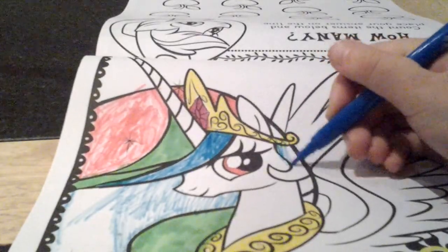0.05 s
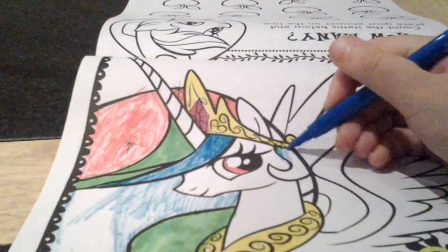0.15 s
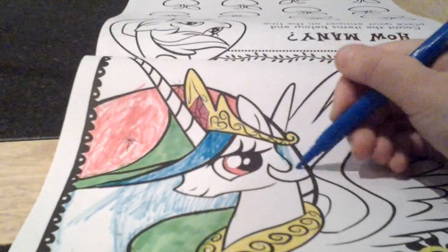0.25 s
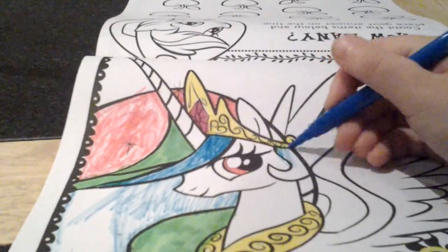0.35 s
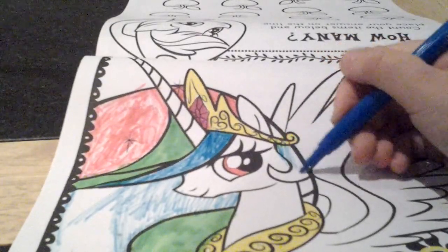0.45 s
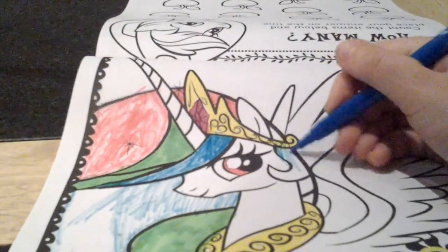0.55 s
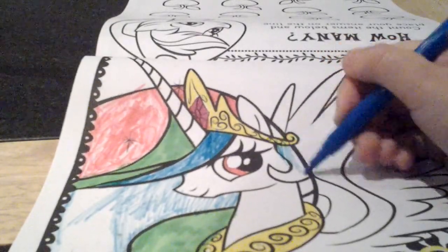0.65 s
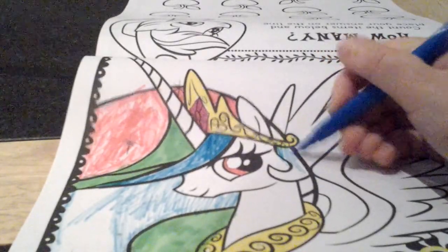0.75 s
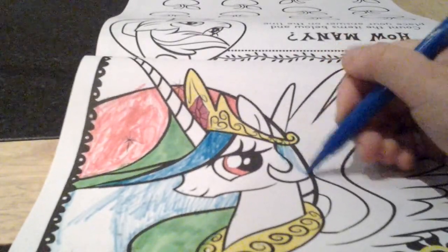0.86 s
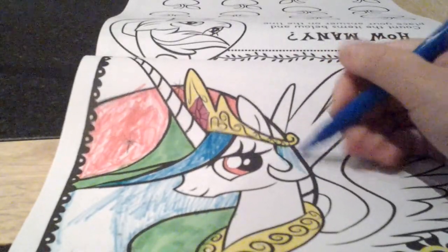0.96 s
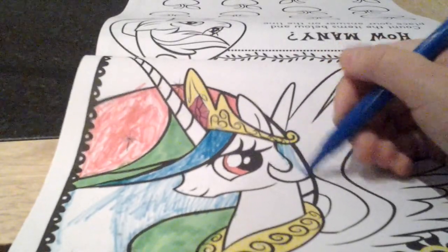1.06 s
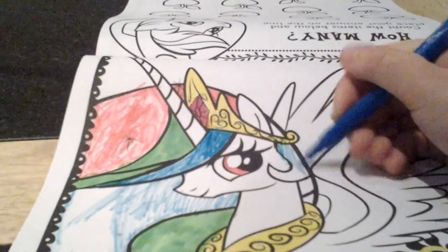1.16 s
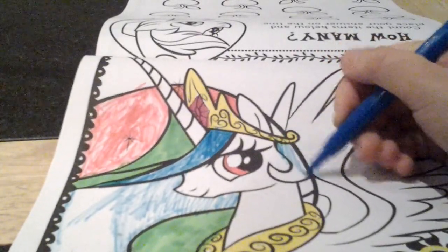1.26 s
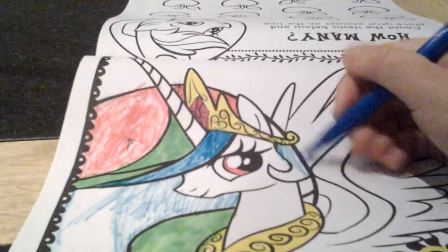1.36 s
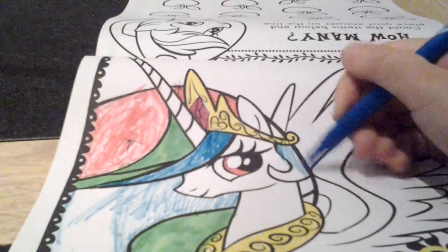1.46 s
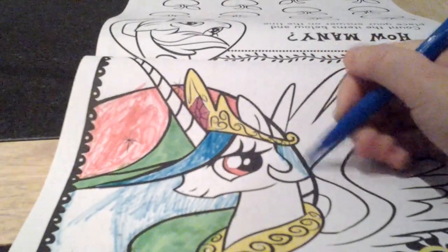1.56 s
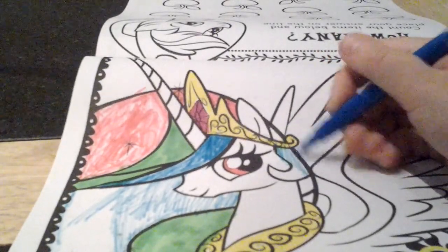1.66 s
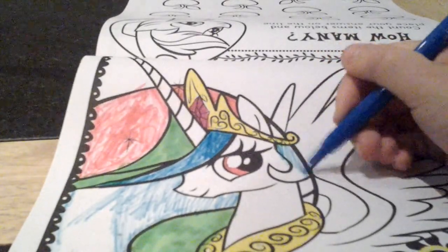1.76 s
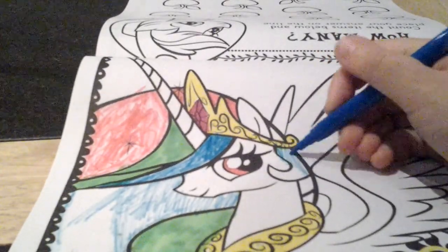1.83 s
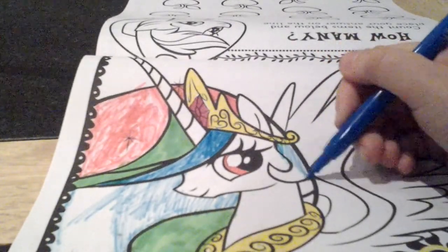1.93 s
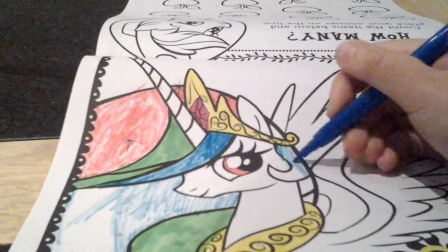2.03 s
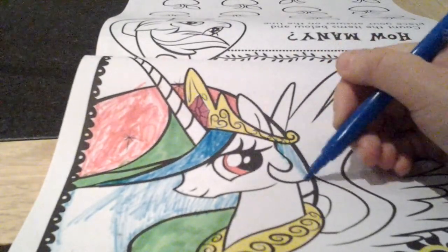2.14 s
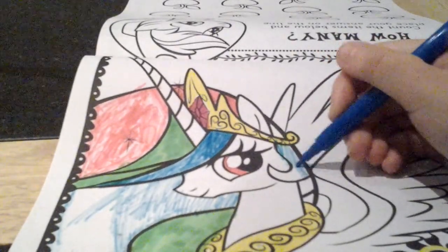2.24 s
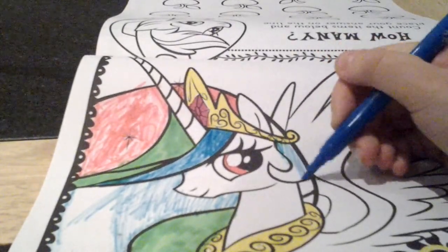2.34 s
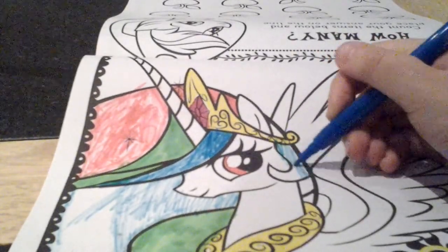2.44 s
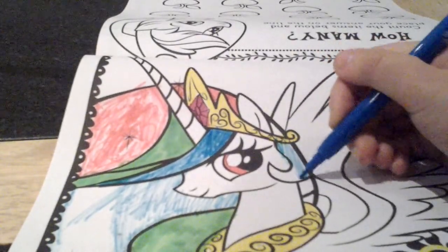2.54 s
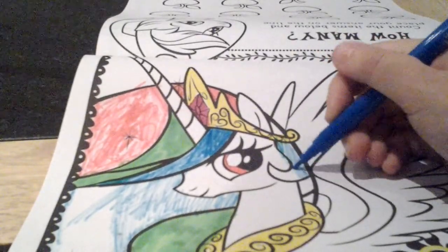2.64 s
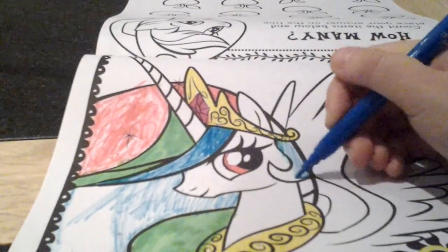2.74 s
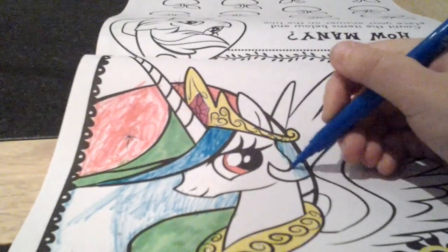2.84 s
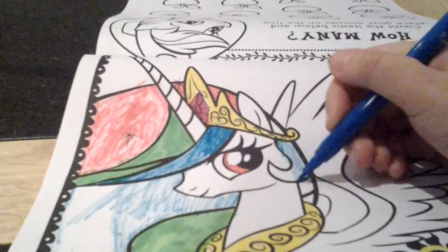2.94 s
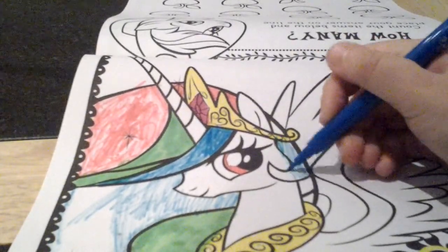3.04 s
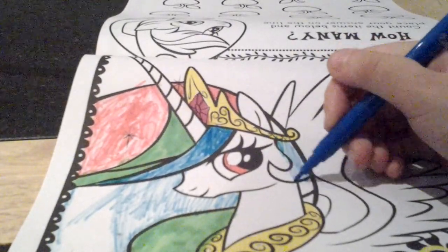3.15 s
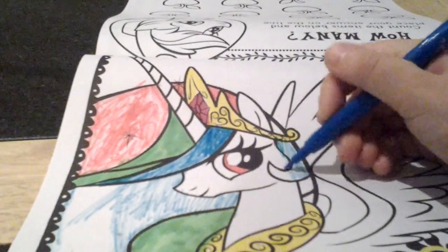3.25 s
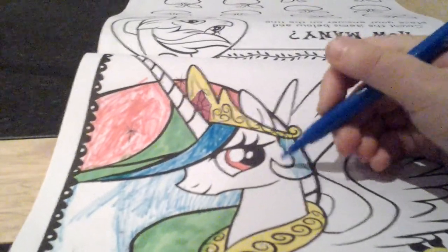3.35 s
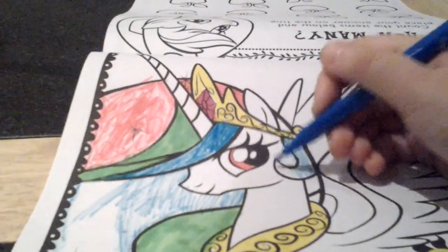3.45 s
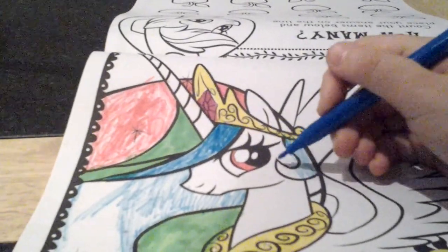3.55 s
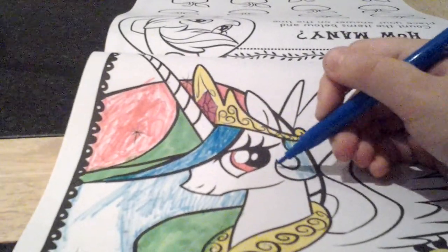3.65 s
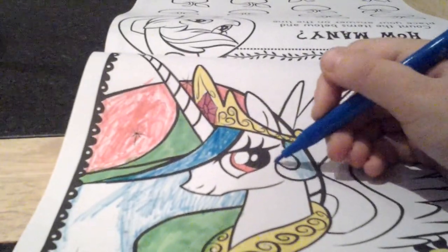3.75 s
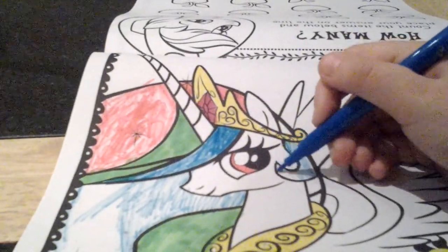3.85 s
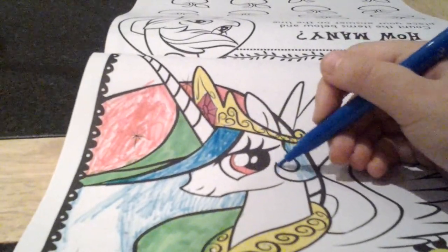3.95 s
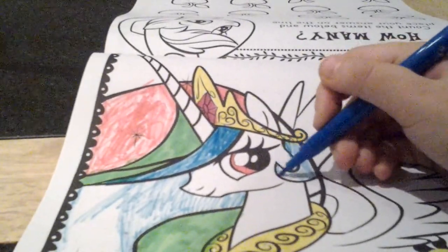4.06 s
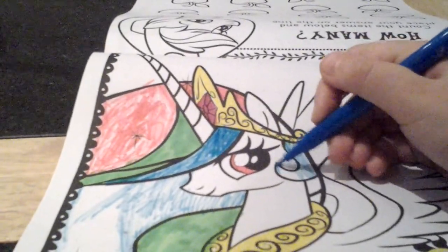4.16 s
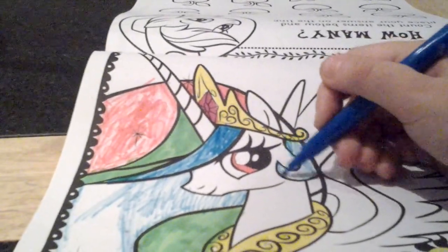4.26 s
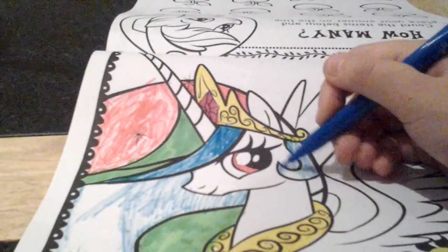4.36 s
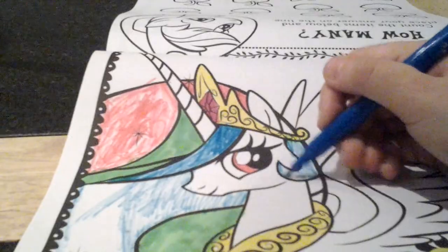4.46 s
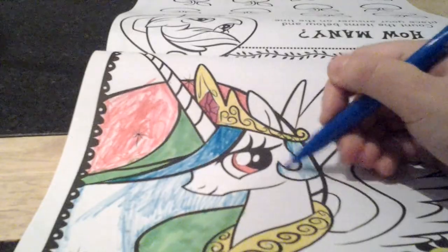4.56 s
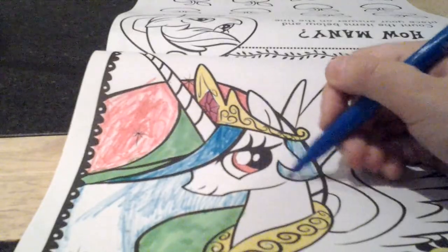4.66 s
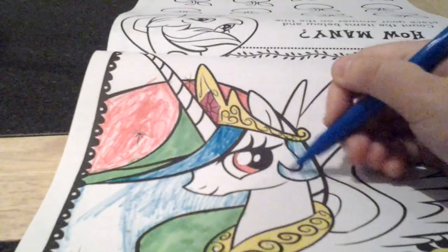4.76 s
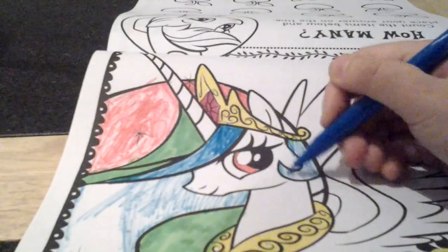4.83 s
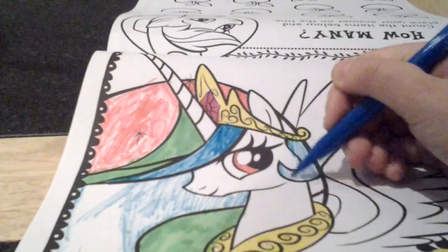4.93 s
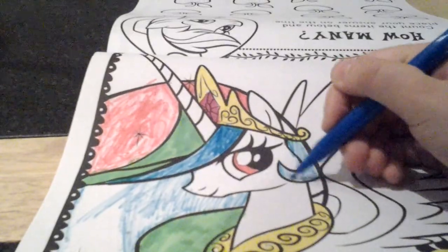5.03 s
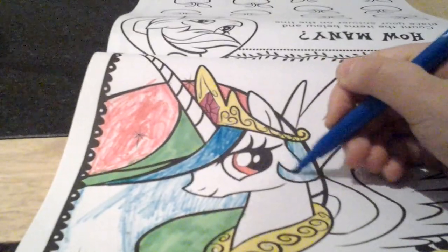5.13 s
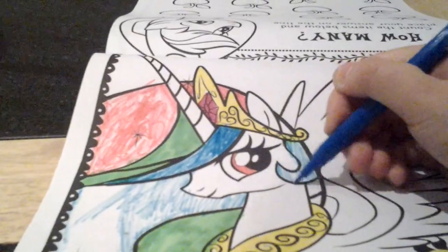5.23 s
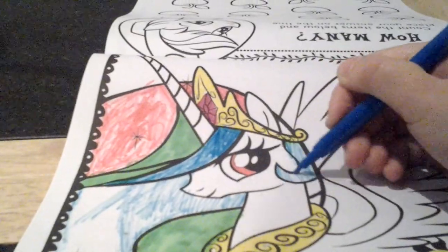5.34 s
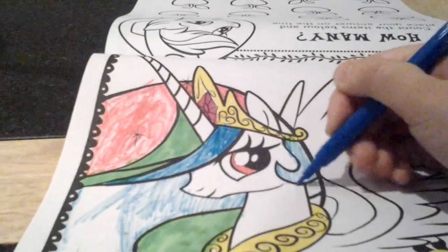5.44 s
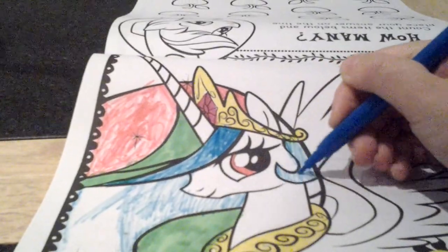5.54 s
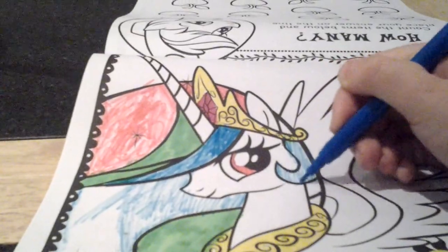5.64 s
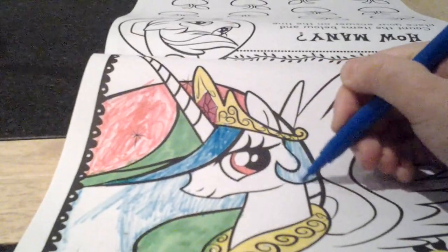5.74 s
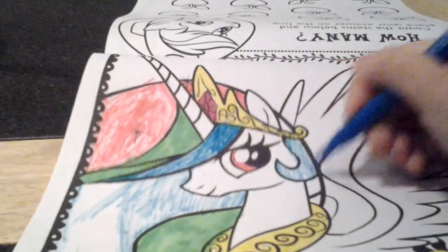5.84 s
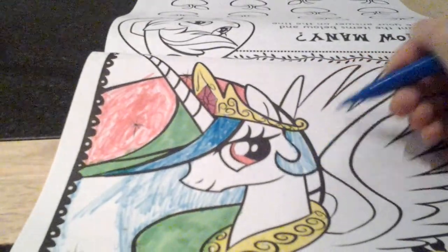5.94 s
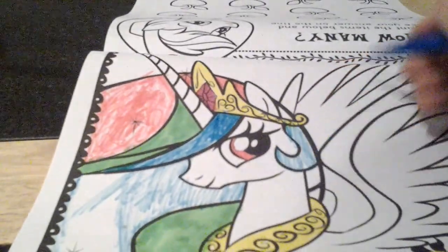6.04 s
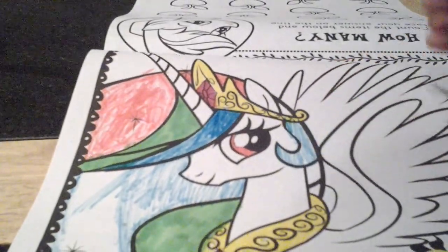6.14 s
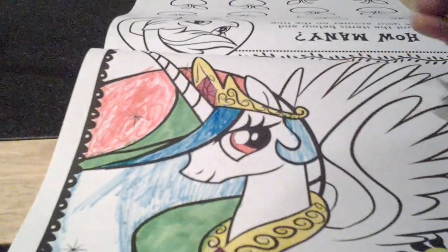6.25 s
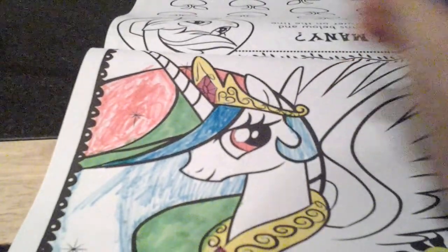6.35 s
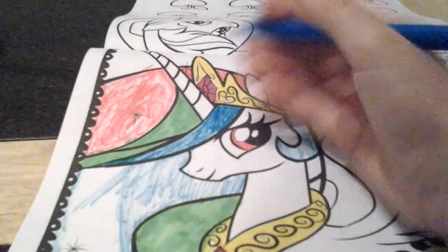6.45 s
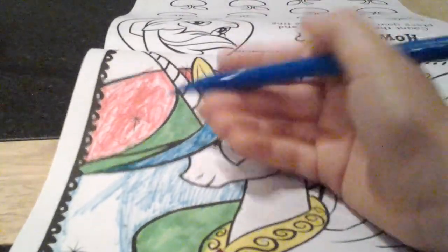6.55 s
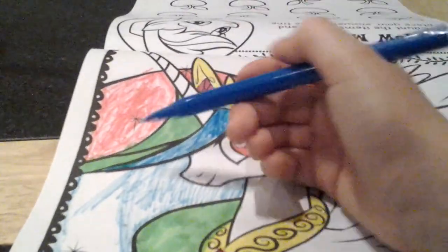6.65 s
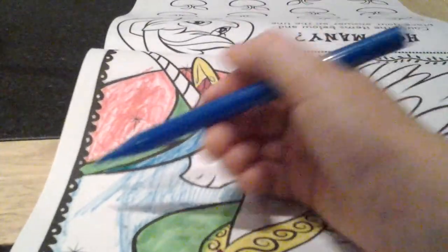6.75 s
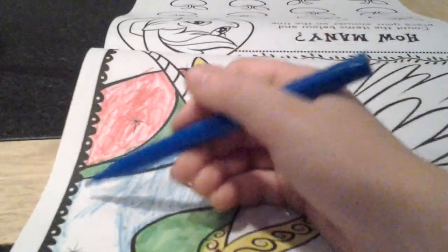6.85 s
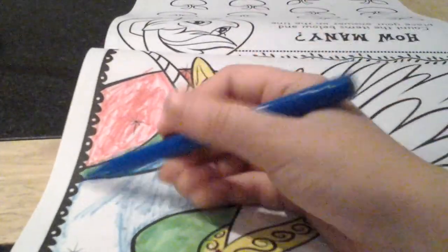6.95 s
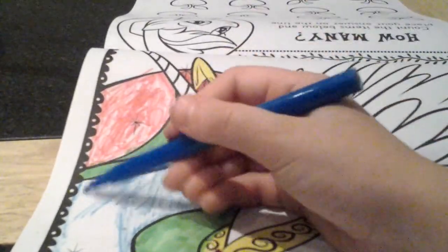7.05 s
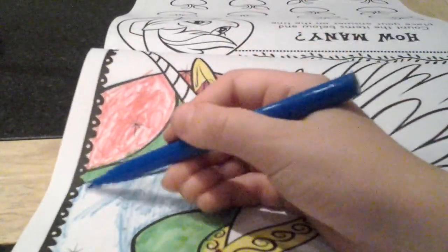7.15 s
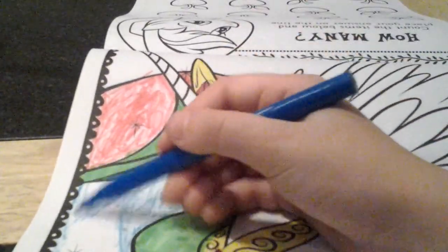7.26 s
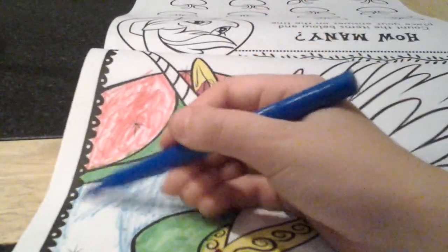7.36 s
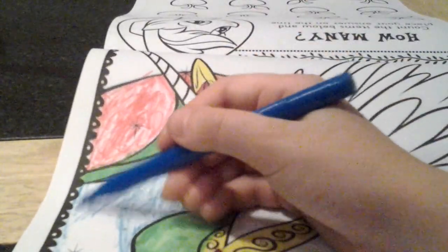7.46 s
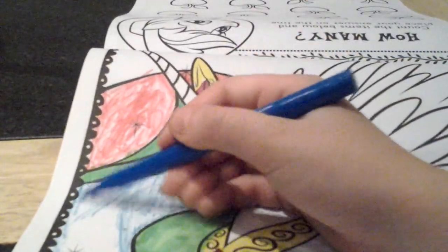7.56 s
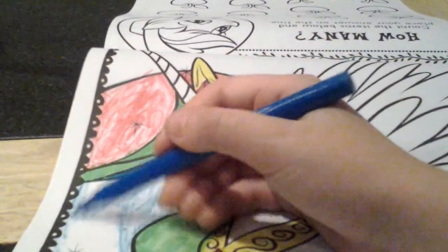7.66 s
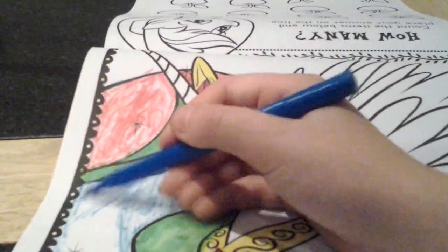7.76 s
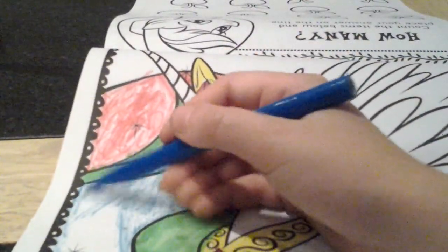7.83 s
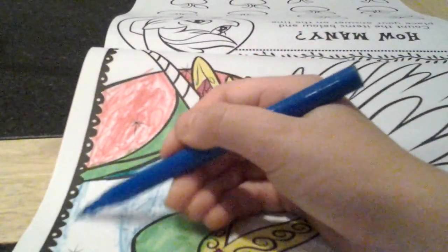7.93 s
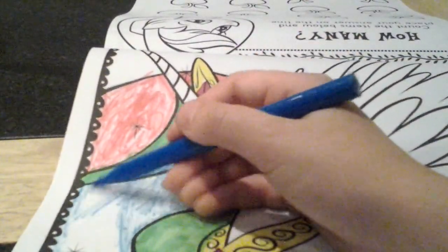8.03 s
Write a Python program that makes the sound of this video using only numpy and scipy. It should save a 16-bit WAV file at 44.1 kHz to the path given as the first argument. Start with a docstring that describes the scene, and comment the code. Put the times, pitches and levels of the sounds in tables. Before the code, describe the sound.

In a quiet, nearly echo-free room, a small close microphone with little bass picks up a felt-tip pen colouring a book page. From 0 to 3.3 s it scribbles back and forth about ten times a second, each stroke a short bright hiss with a lower papery scrape and soft page drumming; it is strongest around 0.7 to 2 s, then lightens slightly. At 3.4 s the pen lifts with small ticks and a brief hand rub, leaving faint low rumble. Very light strokes return at 3.9 s, growing firmer, with duller bumps up to 5.8 s. From 5.8 to 7.05 s the hand slides away and back, with airy skin-on-paper swishes and knocks near 5.9 and 6.2 s. From 7.2 s firmer, brighter scribbling runs to the end just after 8 s, with sharp plastic clicks at 7.72, 7.92 and 8.05 s, the first loudest. Soft steady room noise throughout.

```python
"""Quick hissing strokes, about ten a second: a felt-tip pen colours in a page of a colouring book on a table.
The nib hisses and scrapes over the paper fibres and shakes the page, which drums near 900 Hz.
The pen lifts once; later the hand slides away and back across the page.
Then the pen scribbles on with a flatter grip and clicks sharply three times.
Noise shaped into colours makes the hiss and rubs; decaying tones make the drumming, knocks and clicks."""
import sys
import numpy as np
from scipy import signal
from scipy.fft import rfft, irfft, next_fast_len
from scipy.io import wavfile

SR = 44100
rng = np.random.default_rng(int(sys.argv[2]) if len(sys.argv) > 2 else 0)


def store_wav(level_fs):
    """Save 16-bit WAV to argv[1]."""
    pcm = np.round(np.clip(np.atleast_2d(level_fs), -1, 1) * 32767)
    wavfile.write(sys.argv[1], SR, pcm.T.astype(np.int16))


N = 356929
TIME = np.arange(N) / SR


def from_db(db):
    """Turn decibels into a gain."""
    return 10 ** (np.asarray(db) / 20)


def rms_one(x):
    """Scale a sound to an average strength (rms) of one."""
    return x / np.sqrt(np.mean(x ** 2) + 1e-20)


def level(rows):
    """Make a gain that follows a curve of times and decibels."""
    time_s, level_db = np.transpose(rows)
    return from_db(np.interp(TIME, time_s, level_db))


def gate(t, start, end, attack_s, release_s):
    """A sound sets in, holds and stops: gain from 0 to 1."""
    setting_in = 1 + np.tanh((t - start) / attack_s)
    stopping = 1 + np.tanh((end - t) / release_s)
    return setting_in * stopping / 4


def cut(x, hz, kind="low", order=2):
    """Remove what lies above (low) or below (high) a pitch."""
    sos = signal.butter(order, min(hz, .45 * SR), kind, fs=SR, output="sos")
    return signal.sosfilt(sos, x + 1e-18)


def colour(x, spectrum, peaks=()):
    """Give noise a broad spectrum with resonances on top, at an rms of one."""
    size = next_fast_len(len(x), real=True)
    bins = np.maximum(np.fft.rfftfreq(size, 1 / SR), 1)
    hz, db = np.transpose(spectrum)
    shape = np.interp(np.log(bins), np.log(hz), db)
    for centre, width, height in peaks:
        shape = shape + height / (1 + (2 * (bins - centre) / width) ** 2)
    coloured = irfft(rfft(x, size) * from_db(shape), size)
    return rms_one(coloured[:len(x)])


def bell(x, hz, width_hz, db):
    """Raise or lower a narrow band around one pitch."""
    w, height = 2 * np.pi * hz / SR, np.sqrt(from_db(db))
    spread = np.tan(np.pi * width_hz / SR)
    top = [1 + spread * height, -2 * np.cos(w), 1 - spread * height]
    bottom = [1 + spread / height, -2 * np.cos(w), 1 - spread / height]
    return signal.lfilter(top, bottom, x)


def ring(x, modes):
    """Strike several decaying tones side by side, with alternating sign."""
    out = np.zeros(len(x))
    for k, (hz, db, fade_s) in enumerate(modes):
        r, w = from_db(-60 / (fade_s * SR)), 2 * np.pi * hz / SR
        tone = signal.lfilter([0, np.sin(w)], [1, -2 * r * np.cos(w), r * r], x + 1e-18)
        out += (-1) ** k * from_db(db) * tone
    return out


def blows(rows, column=1):
    """Place one single-sample blow per row, as strong as its decibel column."""
    out = np.zeros(N)
    for row in rows:
        out[round(row[0] * SR)] = from_db(row[column])
    return out


def drift(rate_hz):
    """Wander smoothly at random, with a spread of one."""
    return rms_one(cut(rng.standard_normal(N), rate_hz))


def fibres(per_s, spread_db):
    """Paper fibres catch and let go at random, with uneven force."""
    caught = rng.random(N) < per_s / SR
    force = rng.choice([-1, 1], N) * from_db(spread_db * rng.standard_normal(N))
    return rms_one(caught * force)


# colour of the quiet room's noise: pitch_hz [Hz], level_db [dB per Hz, relative]
ROOM_TONE = [(25, 5), (50, -24), (80, -14.5), (130, -7), (260, -5), (600, -5), (1300, -11.5), (2900, -15),
             (4300, -16), (11700, -17), (14500, -21)]


def room_tone(level_db=-55):
    """The quiet room is a steady, soft noise under everything."""
    return from_db(level_db) * colour(rng.standard_normal(N), ROOM_TONE)


def room(x, fade_s=0.1, wet_db=-13.5, dull_hz=6000):
    """The walls add a faint, dull tail of fading noise."""
    t = TIME[:SR // 2]
    fading = from_db(-60 * t / fade_s) * (t > .005)
    tail = cut(rng.standard_normal(len(t)), dull_hz) * fading
    return x + from_db(wet_db) * signal.fftconvolve(x, tail / np.linalg.norm(tail))[:N]


# swells of the low rumble, mostly in the pauses between strokes: start_s [s], end_s [s], level_db [dB]
RUMBLE_SWELLS = [(3.458, 3.835, -60), (3.87, 3.962, -65), (5.875, 6.184, -65), (6.73, 6.83, -62),
                 (6.94, 7.144, -61.5)]


def rumble(attack_s=0.012, release_s=0.016):
    """A low rumble, made of deep noise, swells mostly in the pauses between strokes."""
    low = colour(rng.standard_normal(N), [(40, -27), (100, -2.5), (190, -9.0), (320, -16), (1000, -45)])
    swells = np.zeros(N)
    for start, end, db in RUMBLE_SWELLS:
        swells += from_db(db) * gate(TIME, start, end, attack_s, release_s)
    return low * swells


# the hand slides on the page: start_s [s], end_s [s], rub_db [dB, before rub_gain_db], hiss_db [dB]
SLIDES = [(3.355, 3.432, -55.5, -48.5), (3.437, 3.556, -62.5, -64), (5.8, 6.034, -60, -60.5),
          (6.127, 6.403, -57.5, -54.5), (6.22, 6.27, -67, -55), (6.4, 6.557, -54.5, -48),
          (6.562, 6.706, -60, -43), (6.87, 6.952, -54.5, -42.5), (7.004, 7.041, -59, -51.5)]
# colour of skin rubbing: pitch_hz [Hz], level_db [dB per Hz, relative]
RUB_COLOUR = [(150, -16), (400, 2), (900, 4.5), (1500, 0.5), (2500, -2.5), (4500, -3.5), (7000, -14),
              (14000, -10.5)]
# colour of skin hissing: pitch_hz [Hz], level_db [dB per Hz, relative]
SKIN_HISS_COLOUR = [(2000, -10.5), (4000, 2), (5500, 4), (6600, 9.5), (8000, 3.5), (10000, -6), (14500, -4)]


def hand(rub_gain_db=4.5, attack_s=0.0064, release_s=0.023):
    """Skin drags on paper: a grainy rub and, with a light quick touch, a smooth hiss."""
    rubbing, hissing = np.zeros(N), np.zeros(N)
    for start, end, rub_db, hiss_db in SLIDES:
        move = gate(TIME, start, end, attack_s, release_s)
        rubbing += from_db(rub_db) * move
        hissing += from_db(hiss_db) * move
    rub = colour(fibres(per_s=6000, spread_db=4.0), RUB_COLOUR) * rubbing
    hiss = colour(rng.standard_normal(N), SKIN_HISS_COLOUR) * hissing
    return from_db(rub_gain_db) * rub + hiss


# small knocks on the book: time_s [s], tick_db [dB, strength of blow], thud_db [dB, strength of blow]
KNOCKS = [(3.3745, -30.5, -32.5), (3.3838, -45, -40), (3.3882, -45, -40), (3.4122, -39, -54),
          (4.7015, -50, -41), (5.8975, -56, -33.5), (5.908, -54, -38), (6.1899, -32, -29),
          (6.204, -43, -44), (6.276, -40.5, -50)]
# tones of a tick: pitch_hz [Hz], level_db [dB, relative], fade_s [s to fall 60 dB]
TICK_MODES = [(2670, 7.5, 0.0017), (4940, 7.5, 0.0025), (5660, 1, 0.0075), (7100, 7.5, 0.0019)]
# tones of a thud: pitch_hz [Hz], level_db [dB, relative], fade_s [s to fall 60 dB]
THUD_MODES = [(457, 2.2, 0.012), (690, 2.6, 0.011), (1050, -1, 0.0097)]


def knocks():
    """The surface ticks and the stack of pages under it gives a dead thud at once."""
    tick = ring(blows(KNOCKS, column=1), TICK_MODES)
    thud = ring(blows(KNOCKS, column=2), THUD_MODES)
    return cut(tick + thud, 320, "high")


# swell of the hiss along the stroke [dB], brightness [dB], shaking of the page [dB]
PUSH, PULL = (0.68, -0.5, 1.07), (2, 1.7, -2)


def direction(k):
    """Strokes go back and forth: even ones push the nib, odd ones pull it."""
    return PULL if k % 2 else PUSH


# how loudly the page drums at the spot being coloured: time_s [s], level_db [dB, before drum_db]
PAGE_DRIVE = [(0.0, -47.5), (1.2, -47), (1.87, -44), (2.25, -53), (3.3, -51), (3.9, -54), (4.85, -46),
              (5.2, -48.5), (5.65, -45), (5.85, -42.5), (7.2, -51.5), (7.68, -45.5), (8.09, -49.5)]


def shaking(push_lead_s=0.0068, pull_lead_s=0.027, rise_s=0.054, fall_s=0.039):
    """A push shakes the page hardest near its end; a pull shakes it less, and earlier in the stroke."""
    power = np.zeros(N)
    for k, (_, end, _) in enumerate(STROKES):
        t = TIME - end + (pull_lead_s if k % 2 else push_lead_s)
        near = abs(t) < .25
        width = np.where(t[near] < 0, rise_s, fall_s)
        power[near] += from_db(direction(k)[2]) ** 2 * np.exp(-(t[near] / width) ** 2)
    return np.sqrt(power) * level(PAGE_DRIVE)


# the nib bumps the page: time_s [s], level_db [dB, strength of blow before softening]
BUMPS = [(0.04, -43), (0.222, -43), (0.804, -38), (1.277, -42), (1.447, -31.5), (1.666, -30),
         (1.877, -30.5), (3.433, -34), (4.223, -34.5), (4.435, -34), (4.642, -43), (4.839, -28.5),
         (5.047, -34.5), (5.369, -28), (5.426, -28.5), (5.611, -22.5), (5.623, -26.5), (5.761, -29.5),
         (5.861, -30.5)]
# tones of the page on the book: pitch_hz [Hz], level_db [dB, relative], fade_s [s to fall 60 dB]
PAGE_MODES = [(470, -19.5, 0.016), (667, -10.5, 0.012), (876, -4, 0.042), (995, -6.5, 0.045),
              (1113, -6.5, 0.023), (1660, -4, 0.0033), (1840, -11, 0.015)]


def page(drum_db=-3.0, soft_hz=1500):
    """Uneven slips of the nib keep the page drumming; soft bumps strike the same tones."""
    slips = cut(fibres(per_s=1200, spread_db=6.0), soft_hz)
    drum = rms_one(cut(ring(slips, PAGE_MODES), 390, "high")) * shaking()
    soft_blows = cut(blows(BUMPS), 1800)
    bumps = cut(ring(soft_blows, PAGE_MODES), 280, "high")
    return from_db(drum_db) * drum + bumps


# sharp clicks of the plastic pen: time_s [s], level_db [dB, before click_db], contact_cutoff_hz [Hz]
CLICKS = [(7.7234, -1.5, 10300), (7.9178, -7.5, 5500), (8.0487, -11, 4900)]
# tones of the pen against the page: pitch_hz [Hz], level_db [dB, relative], fade_s [s to fall 60 dB]
PEN_MODES = [(714, -11, 0.014), (1626, -17.5, 0.01), (2660, -13, 0.0053), (4120, -14, 0.011),
             (5130, -10.5, 0.015), (6200, -8.5, 0.0043), (7200, -5.5, 0.0039), (9060, -4, 0.0031),
             (11000, -17, 0.011)]


def pen_clicks(click_db=0.55, rattle_s=.00068, rattle_db=-7.0):
    """Each click rings the pen for a few milliseconds and strikes once more at once; softer contact is duller."""
    out = np.zeros(N)
    for time_s, level_db, cutoff_hz in CLICKS:
        contact = cut(signal.unit_impulse(SR // 100), cutoff_hz, order=1)
        for delay_s, change_db in ((0, 0), (rattle_s, rattle_db)):
            at = round((time_s + delay_s) * SR)
            out[at:at + len(contact)] += from_db(level_db + change_db + click_db) * contact
    return cut(ring(out, PEN_MODES), 750, "high")


REGRIP_S = (3.6, 6.5)  # times of a new grip [s]
# nib hiss with the pen upright: pitch_hz [Hz], level_db [dB per Hz, relative]
UPRIGHT = [(2000, -23), (3600, -15.5), (4500, -8), (5500, -2), (7200, 1), (8800, 1), (10500, -3.5),
           (12500, -5.5), (14500, -45)]
# nib hiss with the pen held flat: pitch_hz [Hz], level_db [dB per Hz, relative]
FLAT = [(2000, -37), (3500, -12), (4500, -4.5), (6200, -0.5), (7500, 3), (8900, 0.5), (10200, 2.5),
        (11500, -2), (12600, -4.5), (14500, -7.5)]
# pen resonances in the first grip: pitch_hz [Hz], width_hz [Hz], height_db [dB]
FIRST_PEAKS = [(5500, 500, 3), (6200, 400, -3), (7950, 300, -2), (8450, 350, 5), (8790, 220, -7),
               (10000, 500, 4), (10830, 260, 5), (11230, 240, -6), (13100, 400, 3)]
# pen resonances in the second grip: pitch_hz [Hz], width_hz [Hz], height_db [dB]
SECOND_PEAKS = [(4150, 300, 3), (5280, 650, 5), (6100, 400, -4), (6900, 400, 3), (7830, 300, -5),
                (8350, 380, 6), (8830, 260, -6), (9800, 700, 3), (10900, 350, 4), (11520, 350, -5)]
# pen resonances in the third grip: pitch_hz [Hz], width_hz [Hz], height_db [dB]
THIRD_PEAKS = [(4050, 300, 7), (6100, 400, -3), (7750, 400, -4), (8300, 400, 7), (8850, 300, -7),
               (10300, 1100, 3), (11250, 300, -5), (11750, 400, 5), (12300, 300, -4), (13650, 650, 7)]


def grip(time_s):
    """The way the pen is held sets the spectrum and resonances of its hiss."""
    grips = [(UPRIGHT, FIRST_PEAKS), (UPRIGHT, SECOND_PEAKS), (FLAT, THIRD_PEAKS)]
    return grips[np.searchsorted(REGRIP_S, time_s)]


def stroke_force(t, start, end, swell_db, rise_s=0.0036, fall_s=0.014, onset_db=-0.4, onset_s=0.0072,
                 turn_db=-10.0, turn_s=0.038):
    """The hiss sets in quickly, mostly swells along the stroke, and only creeps at the turn: two gains."""
    moving = gate(t, start, end, rise_s, fall_s)
    along = np.clip((t - start) / (end - start), 0, 1)
    onset_dip = onset_db * np.exp(-abs(t - start) / onset_s)
    drag = moving * from_db(swell_db * (along - .5) + onset_dip)
    outside = np.maximum(abs(t - (start + end) / 2) - (end - start) / 2, 0)
    creep = from_db(turn_db) * (1 - moving) * np.exp(-(outside / turn_s) ** 2)
    return drag, creep


def stroke_hiss(grain, t, start, end, bright_db, ring_db, ring_hz=7130, ring_width_hz=780,
                bright_hz=11300, bright_width_hz=4200, detune=0.0088, patchy_db=4.5, count=44):
    """The nib meets the paper at a new angle each time; its hiss changes colour along the stroke."""
    spectrum, peaks = grip(start)
    angle = rng.standard_normal()
    tones = list(peaks) + [(ring_hz, ring_width_hz, ring_db), (bright_hz, bright_width_hz, bright_db)]
    # the angle moves all resonances up or down together
    tones = [(hz * (1 + detune * angle), width, height) for hz, width, height in tones]
    colours = []
    for _ in ("start", "end"):
        patches = [(hz, 110, patchy_db * rng.standard_normal()) for hz in rng.uniform(4000, 14500, count)]
        colours.append(colour(grain, spectrum, tones + patches))
    along = np.clip((t - start) / (end - start), 0, 1)
    return (1 - along) * colours[0] + along * colours[1]


# pen strokes, a push and a pull in turn: start_s [s], end_s [s], level_db [dB, before hiss_db]
STROKES = [(-0.06, 0.015, -47.0), (0.03, 0.088, -42), (0.13, 0.198, -43.0), (0.227, 0.292, -42.5),
           (0.324, 0.396, -40), (0.421, 0.496, -42.0), (0.539, 0.606, -39), (0.639, 0.706, -38.5),
           (0.75, 0.816, -37.5), (0.852, 0.925, -37), (0.961, 1.028, -39.5), (1.061, 1.135, -38),
           (1.163, 1.233, -41.0), (1.271, 1.332, -38), (1.364, 1.438, -39.5), (1.478, 1.549, -37.5),
           (1.586, 1.669, -40.5), (1.702, 1.776, -40), (1.821, 1.879, -39), (1.91, 1.984, -39),
           (2.013, 2.075, -40.5), (2.119, 2.179, -38.5), (2.22, 2.274, -41.0), (2.324, 2.376, -39),
           (2.425, 2.472, -41.5), (2.509, 2.581, -42.5), (2.643, 2.686, -44.5), (2.735, 2.783, -41),
           (2.822, 2.877, -46.5), (2.93, 2.98, -40), (3.037, 3.089, -42), (3.132, 3.187, -43.5),
           (3.245, 3.297, -43), (3.862, 3.91, -57.5), (3.966, 4.016, -53.5), (4.054, 4.113, -48.5),
           (4.159, 4.224, -49), (4.254, 4.316, -45.5), (4.366, 4.432, -43.5), (4.469, 4.527, -45),
           (4.566, 4.638, -43.5), (4.675, 4.734, -43.0), (4.767, 4.834, -44.5), (4.864, 4.922, -39.5),
           (4.967, 5.017, -43.5), (5.055, 5.096, -42), (5.146, 5.207, -45), (5.234, 5.296, -40),
           (5.327, 5.393, -43), (5.432, 5.483, -38), (5.508, 5.568, -45), (5.616, 5.658, -37.5),
           (5.677, 5.734, -47.5), (5.769, 5.804, -47), (7.183, 7.252, -44.0), (7.266, 7.333, -37),
           (7.368, 7.449, -38.5), (7.476, 7.546, -37), (7.581, 7.655, -39), (7.67, 7.736, -38),
           (7.768, 7.85, -36), (7.867, 7.94, -40), (7.98, 8.069, -35)]
# the hiss changes colour as the pen tilts: time_s [s], brightness_db [dB, before push or pull], ring_db [dB]
NIB_COLOUR = [(0.0, 7, 6.5), (0.8, 5, 10.5), (1.65, 9, 11.5), (2.4, 2, 13), (3.25, 0, 12), (4.15, -11, 2),
              (4.65, 1, 5), (5.0, -11, 1), (5.5, 0, 1), (5.63, -22, -2), (5.8, -22, 4), (7.18, 4, 2),
              (8.08, 4.5, -2)]
# low scrape of the paper under the nib: pitch_hz [Hz], level_db [dB per Hz, relative]
SCRAPE = [(100, -36), (220, -3), (500, 2.5), (1200, -0.5), (1700, 0), (2300, -1), (2900, -3.5),
          (3500, -6.5), (4500, -0.5), (7000, -6.5)]
# resonances of the coarser scrape with the pen held flat: pitch_hz [Hz], width_hz [Hz], height_db [dB]
FLAT_SCRAPE_PEAKS = [(1850, 150, -4), (2150, 130, 3), (2600, 520, 0), (3030, 230, 8), (3480, 380, -5),
                     (3980, 200, 8), (5600, 600, 7)]


def nib(hiss_db=-1.0, scrape_db=-49.5, scrape_growth=0.4, flutter_db=1.15, snap_db=-50.0, size=16384):
    """Countless fibre snaps sound through the pen as a hiss and through the paper as a lower scrape."""
    grain = fibres(per_s=16000, spread_db=1.5) * from_db(flutter_db * drift(44))
    hiss, power = np.zeros(N), np.zeros(N)
    colour_s, brightness, ringing = np.transpose(NIB_COLOUR)
    for k, (start, end, db) in enumerate(STROKES):
        swell_db, bright_db, _ = direction(k)
        bright_db = bright_db + np.interp(start, colour_s, brightness)
        ring_db = np.interp(start, colour_s, ringing)
        # work on a short stretch of time around the stroke
        first = int(np.clip((start + end) / 2 * SR - size / 2, 0, N - size))
        near = slice(first, first + size)
        drag, creep = from_db(db) * np.array(stroke_force(TIME[near], start, end, swell_db))
        hiss[near] += drag * stroke_hiss(grain[near], TIME[near], start, end, bright_db, ring_db)
        # creeping is too gentle to ring the pen
        hiss[near] += creep * colour(rng.standard_normal(size), grip(start)[0])
        power[near] += drag ** 2 + creep ** 2
    # the scrape grows less with speed than the hiss does
    speed = (np.sqrt(power) / from_db(-40)) ** scrape_growth
    upright_scrape = colour(grain, SCRAPE)
    flat_scrape = colour(grain, SCRAPE, FLAT_SCRAPE_PEAKS)
    scrape = np.where(TIME < REGRIP_S[1], upright_scrape, flat_scrape) * speed
    # now and then a coarse fibre lets go with a tiny tick
    coarse = (rng.random(N) < 14 / SR) * rng.standard_normal(N)
    snaps = ring(coarse * speed, TICK_MODES)
    return from_db(hiss_db) * hiss + from_db(scrape_db) * scrape + from_db(snap_db) * snaps


def scene():
    """Pen, page and hand sound in a quiet room; the clicks of the pen arrive almost dry."""
    drawing = room(nib() + page() + knocks() + hand())
    clicks = room(pen_clicks(), wet_db=-23.0)
    return (drawing + clicks + rumble() + room_tone())[None, :]


# notches and small peaks of the microphone's housing: pitch_hz [Hz], width_hz [Hz], height_db [dB]
HOUSING = [(4440, 310, -2.5), (5100, 310, -0.5), (6220, 320, -1.5), (7640, 330, 0), (8000, 260, -1.5),
           (8780, 280, -4), (9000, 300, 3), (9830, 350, 2.5), (11270, 410, -1), (11850, 380, 0.5),
           (12600, 400, -5), (13150, 450, 4)]


def record(dry, bass_hz=62, top_hz=14550):
    """The small microphone loses the deep bass and the top, and its housing colours the treble."""
    thin = cut(dry, bass_hz, "high")
    for hz, width_hz, db in HOUSING:
        thin = bell(thin, hz, width_hz, db)
    steep = signal.ellip(12, .1, 80, top_hz, fs=SR, output="sos")
    return signal.sosfilt(steep, thin)


dry = scene()
out = record(dry)
store_wav(out)
```